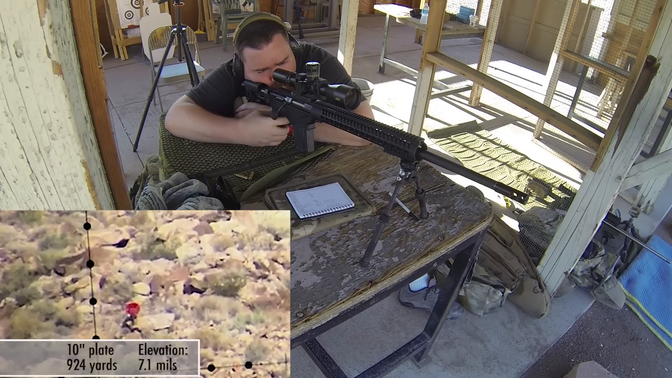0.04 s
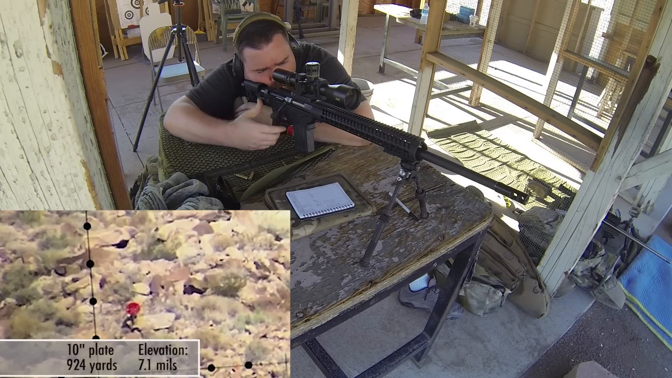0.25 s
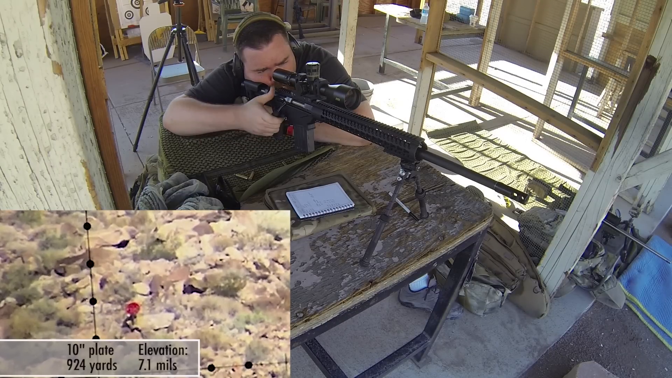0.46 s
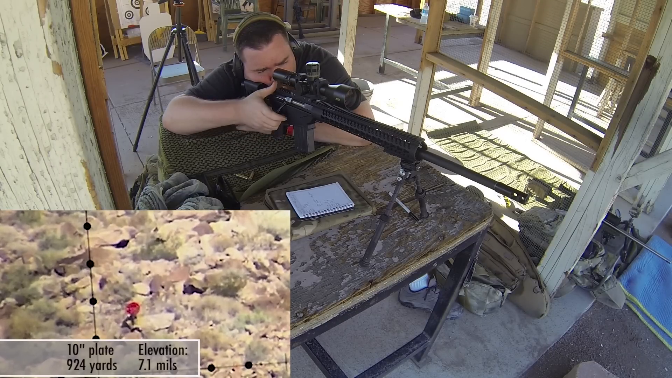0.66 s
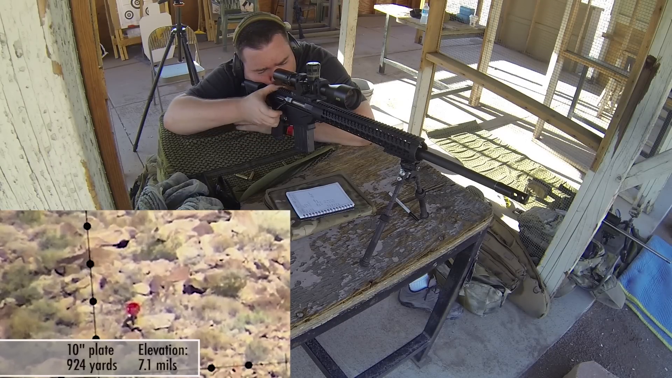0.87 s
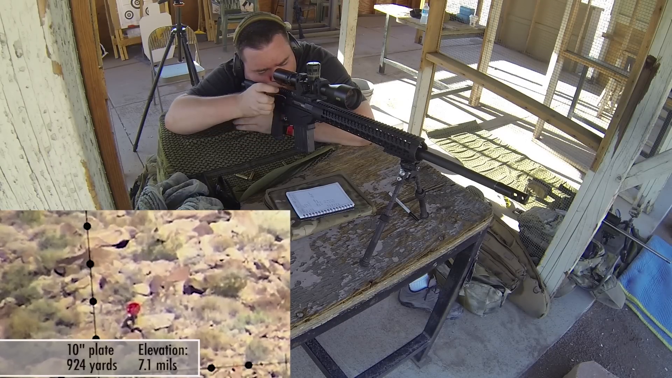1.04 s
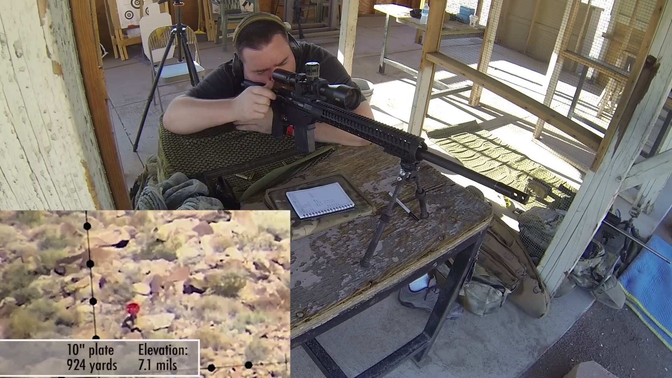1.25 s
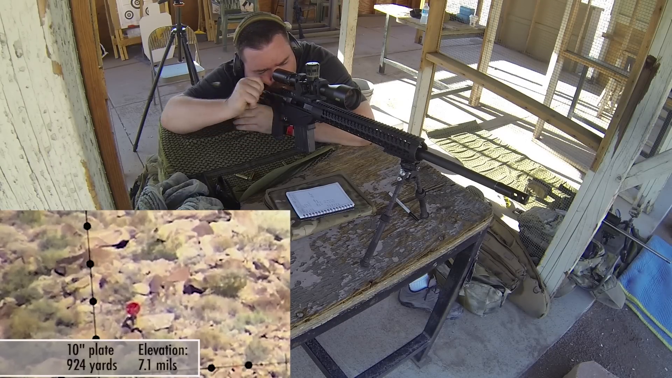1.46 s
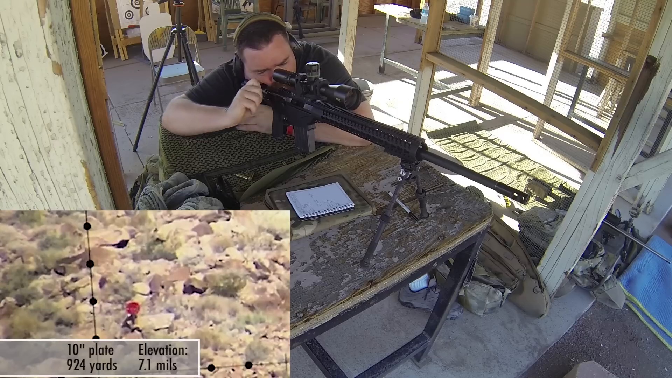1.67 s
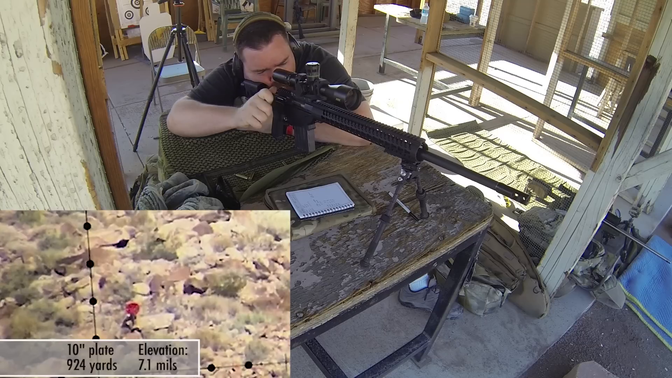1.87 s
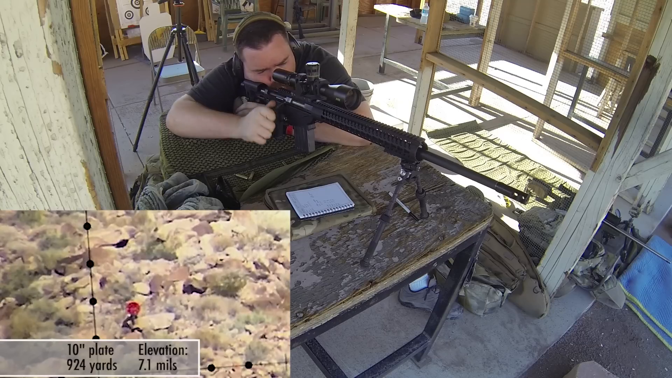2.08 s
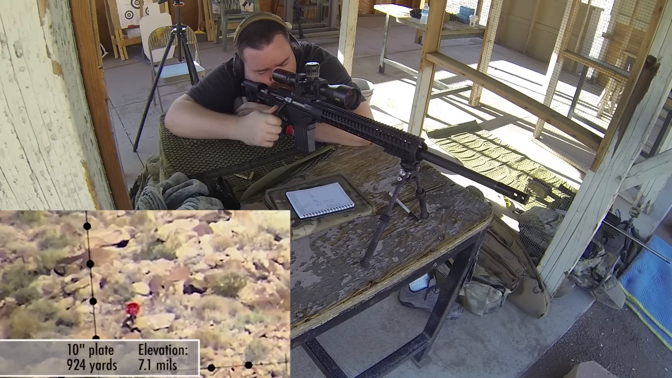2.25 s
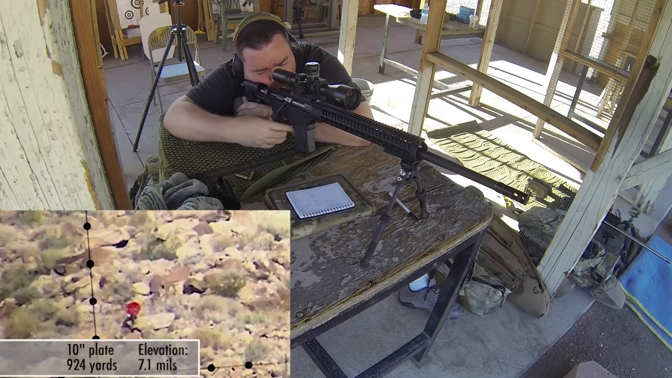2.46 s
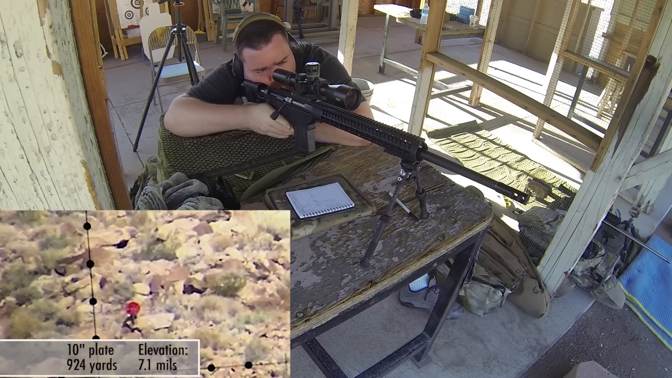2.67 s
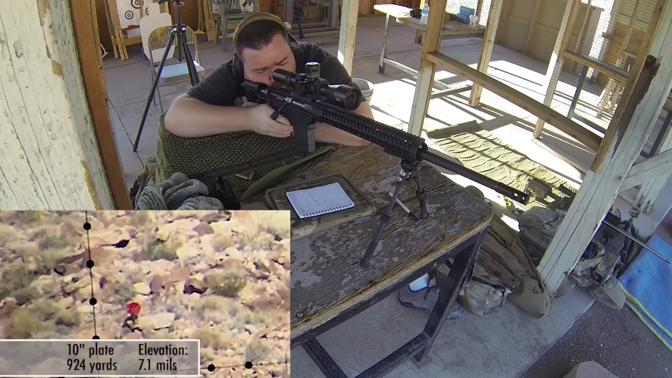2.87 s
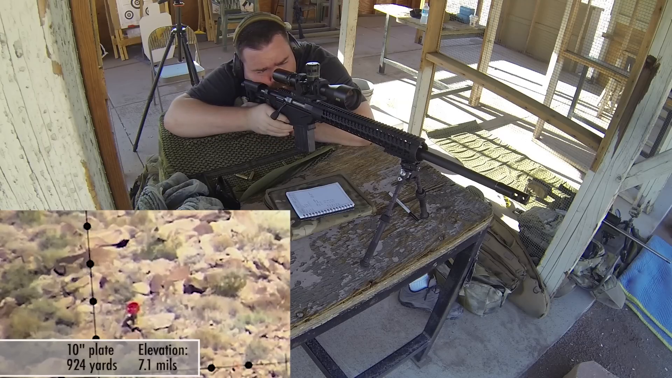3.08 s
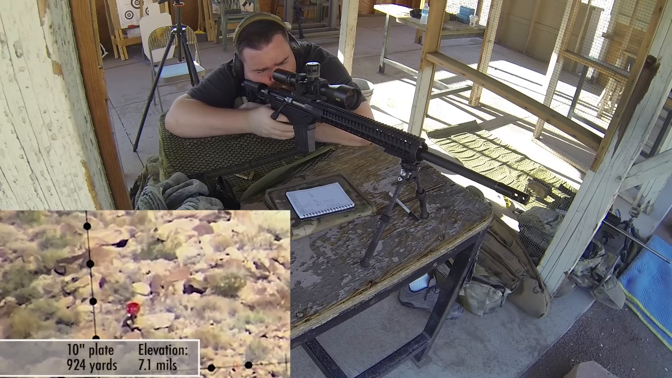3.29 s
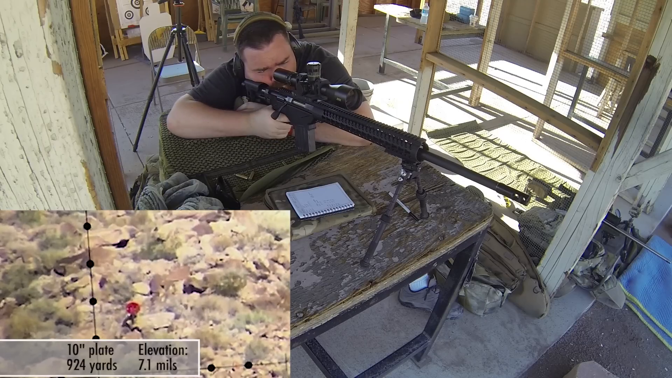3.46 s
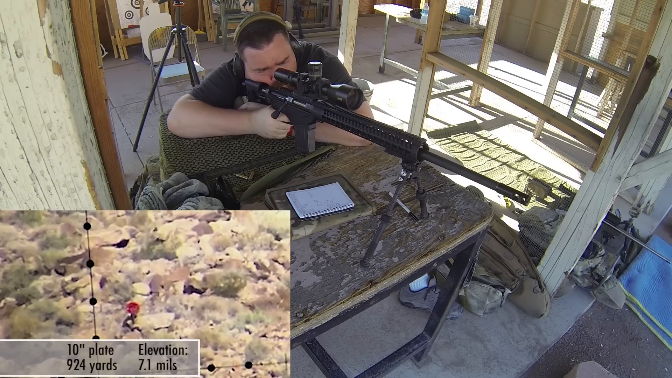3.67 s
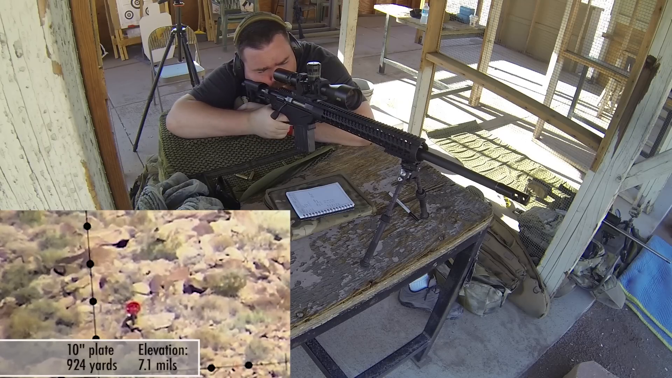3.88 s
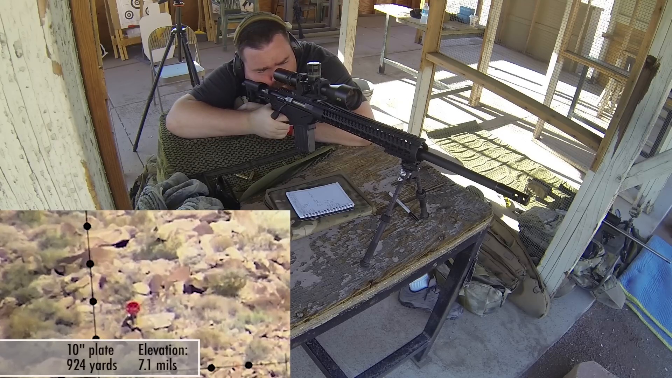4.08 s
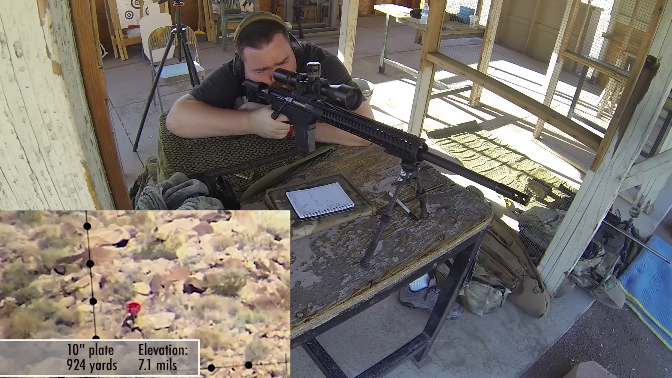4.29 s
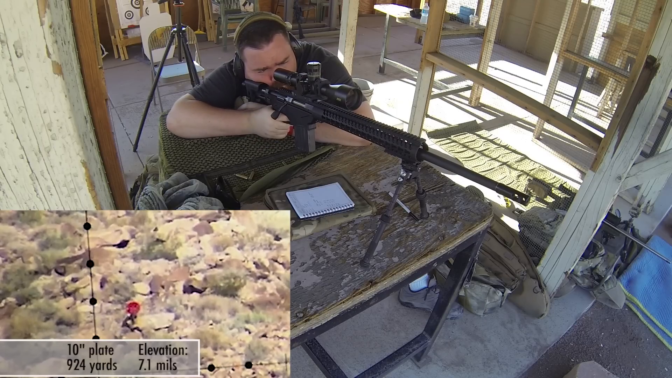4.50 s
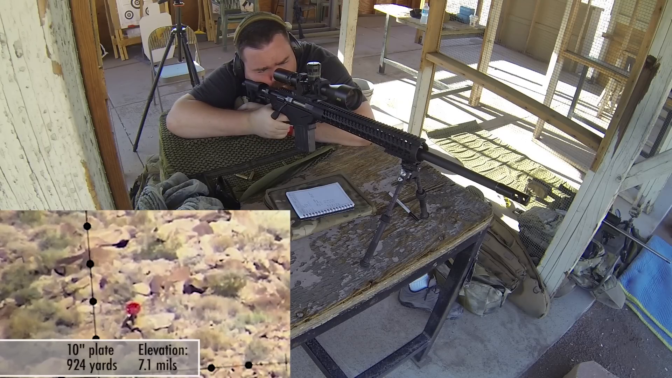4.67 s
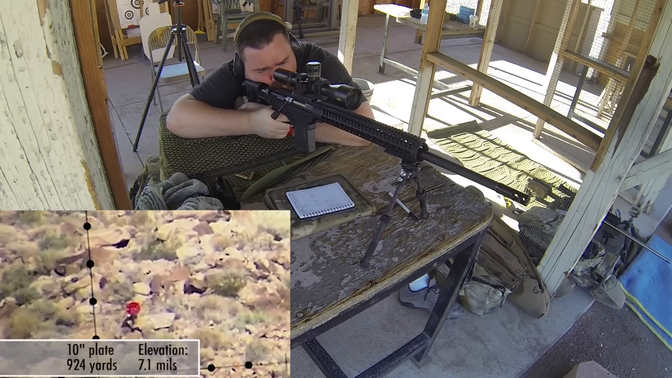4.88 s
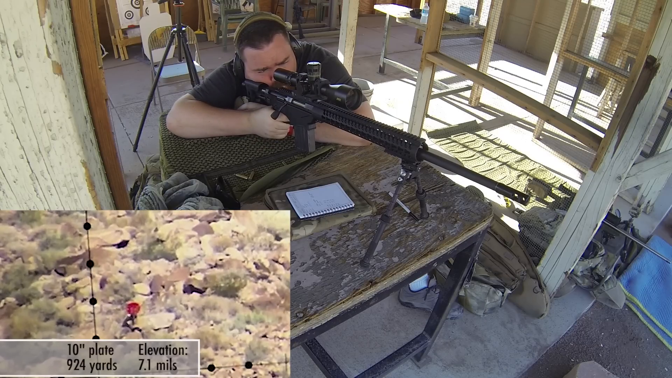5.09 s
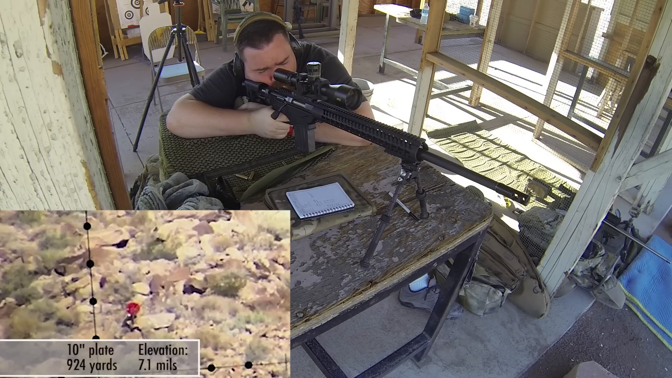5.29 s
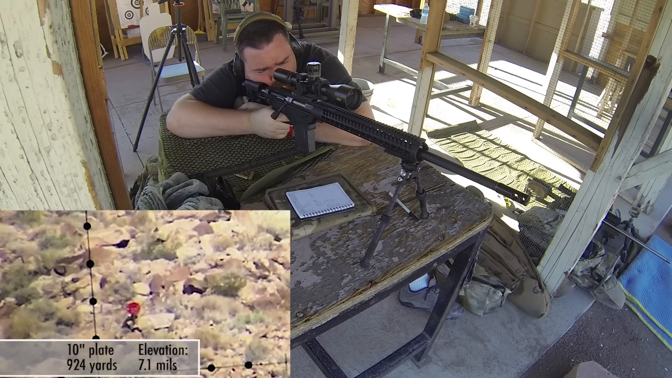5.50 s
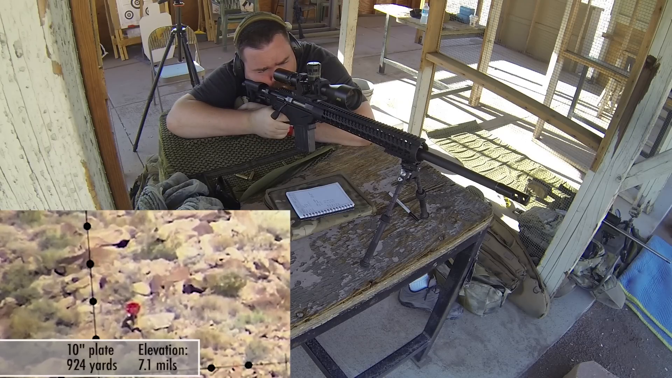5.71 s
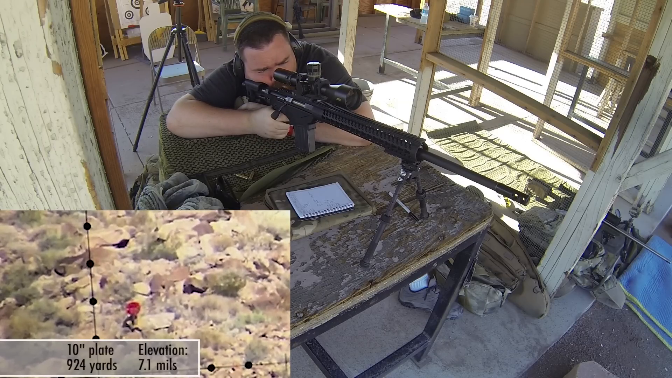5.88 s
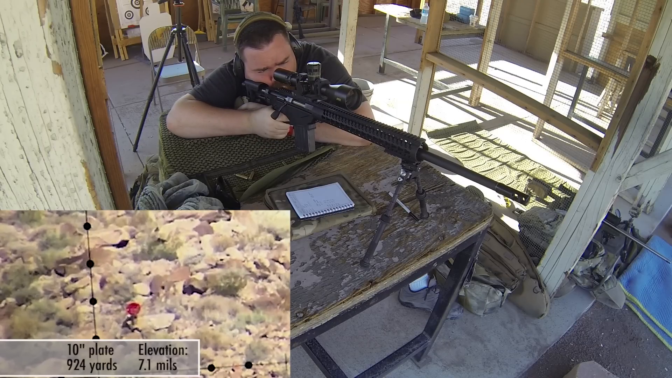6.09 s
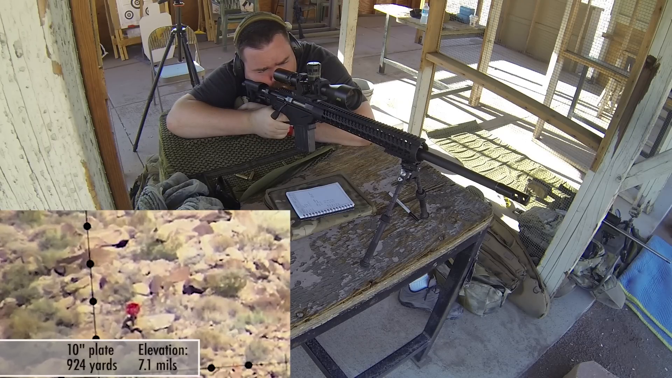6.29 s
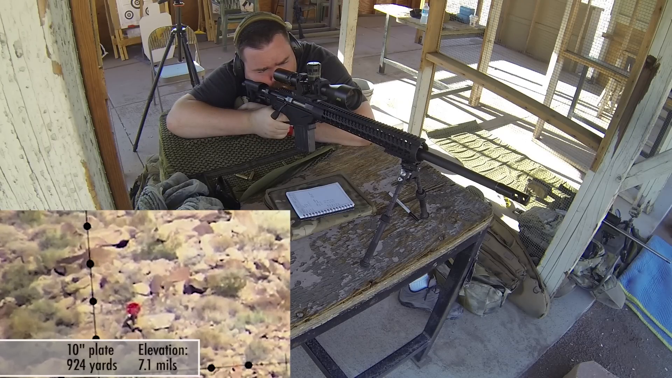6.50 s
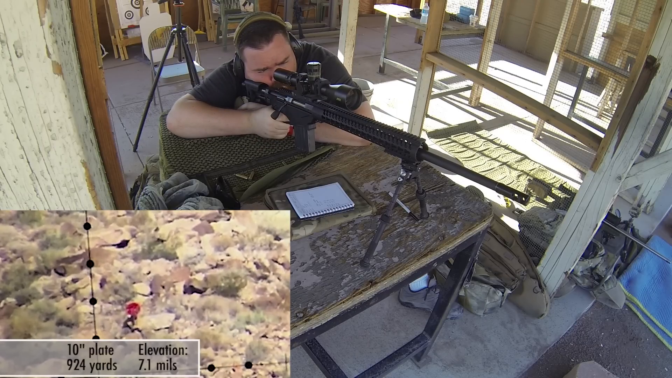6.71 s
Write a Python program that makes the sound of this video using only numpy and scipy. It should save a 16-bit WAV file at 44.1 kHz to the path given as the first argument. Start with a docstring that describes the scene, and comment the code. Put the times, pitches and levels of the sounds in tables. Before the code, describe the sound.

Very close, a bolt-action rifle is worked on a bench under an open roof: a hard steel clack, a fast rattling pull back, a gritty push forward and a firm snap shut. The empty brass case pings and hops on concrete. Quiet low outdoor rumble and faint engine hum follow, until a more distant shot thumps, echoes dully and rolls away into the hills.

```python
"""Bolt-action rifle under a range roof

Close to the microphone a rifle on a bench is cycled: steel contacts crack and ring, and the strokes between
them scrape by stick and slip. The brass case pings and bounces on concrete, a few decaying modes per hit.
Later a far shot thumps in: a blast wave, its duller reflections and scattered noise. Soft swells of noise
roll back from the hills over low air rumble, a distant engine's two partials and faint electronic chirps.
"""
import sys
import numpy as np
from scipy import signal
from scipy.fft import rfft, irfft, next_fast_len
from scipy.io import wavfile
from scipy.ndimage import map_coordinates

SR = 44100
rng = np.random.default_rng(int(sys.argv[2]) if len(sys.argv) > 2 else 0)


def to_wav(s):
    """Save 16-bit WAV."""
    ch = np.atleast_2d(s).T  # columns
    pcm = np.round(np.clip(ch, -1, 1) * 32767)  # PCM
    wavfile.write(sys.argv[1], SR, pcm.astype(np.int16))


N = 297586
TIME = np.arange(N) / SR  # s
RING = TIME[:SR // 2]  # half a second for one hit, s

# dense body of struck or scraped steel: [f/Hz, relative level/dB per Hz]
STEEL_SPECTRUM = [(100, -24), (300, -8), (700, -8.5), (1200, -5), (1700, 2), (2300, 0.5), (3200, -1),
                  (4800, 3), (7500, -4.5), (10000, -12), (13000, -25), (15500, -37)]
# the far shot and its reflections: [t/s, relative level/dB, treble edge f/Hz]
SHOT_ARRIVALS = [(5.258, 0, 7000), (5.3, -17.5, 900), (5.3087, -9.5, 600), (5.511, -10.5, 600)]
# treble scattered from the far shot: [f/Hz, relative level/dB per Hz]
SPRAY_SPECTRUM = [(300, 10), (700, 9.5), (1100, 4.5), (1600, 5), (2300, 1.5), (4500, -2), (6500, -6),
                  (9000, -21), (15000, -46)]
# scatter around the last reflection: [f/Hz, relative level/dB per Hz]
ECHO_SPECTRUM = [(150, 4), (400, 11.5), (900, 1.5), (1200, -2), (1650, 0), (2000, -16), (5000, -23),
                 (14000, -55)]


def undb(db):
    """Decibels to gain."""
    return 10 ** (np.asarray(db) / 20)


def unit(x):
    """Scale to rms 1."""
    return x / np.sqrt(np.mean(x ** 2))


def blow(x):
    """Scale a hit to the energy of one millisecond at full level."""
    return x / np.sqrt(np.sum(x ** 2) * 1000 / SR)


def fade(t60):
    """Exponential decay that falls by 60 dB in t60 seconds."""
    return np.exp(-np.log(1000) * RING / max(t60, 1 / SR))


def colour(x, points, tilt_db=0):
    """Causal minimum-phase filter through (Hz, dB) points, tilted per octave about 3 kHz."""
    size = 2 * next_fast_len(len(x) // 2 + 2048)
    octave = np.log2(np.maximum(np.fft.rfftfreq(size, 1 / SR), 10))
    hz, db = np.transpose(points)
    gain_db = np.interp(octave, np.log2(hz), db)
    gain_db = gain_db + tilt_db * np.clip(octave - np.log2(3000), -2, 2)
    # folding the cepstrum onto positive time makes the filter causal
    cepstrum = irfft(np.log(undb(gain_db)))
    cepstrum[1:size // 2] *= 2
    cepstrum[size // 2 + 1:] = 0
    response = np.exp(rfft(cepstrum))
    return irfft(rfft(x, size) * response)[:len(x)]


def edge(x, hz, kind, order=2):
    """Butterworth low-pass or high-pass."""
    sos = signal.butter(order, min(hz, SR / 2 - 1), kind, fs=SR, output="sos")
    return signal.sosfilt(sos, x)


def noise(points):
    """Steady noise of a given spectrum."""
    return unit(colour(rng.standard_normal(N), points))


def walk(rate):
    """Random wander with an rms of 1, through `rate` random points per second."""
    knots = rng.standard_normal(2048)
    return unit(np.interp(TIME * rate, np.arange(len(knots)), knots))


def ring(modes, detune):
    """Decaying modes of fixed relative strength; sign and, slightly, pitch vary from blow to blow."""
    chance = rng.standard_normal((len(modes), 2))
    tone = 0
    for (hz, db, t60), (side, shift) in zip(modes, chance):
        swing = np.sin(2 * np.pi * hz * (1 + detune * shift) * RING)
        tone = tone + np.sign(side) * undb(db) * fade(t60) * swing
    return blow(tone)


def crack(points, t60, tilt_db=0):
    """Decaying coloured noise: a dense cloud of short-lived modes."""
    return blow(colour(rng.standard_normal(len(RING)) * fade(t60), points, tilt_db))


def add(track, s, sound):
    """Mix a sound in at a time in seconds."""
    start = max(int(s * SR), 0)
    track[start:start + len(sound)] += sound[:N - start]


def slips(rate, spread_db):
    """Stick and slip: tiny catches of uneven size at random moments, `rate` per second on average."""
    caught = rng.random(N) < rate / SR
    side = rng.choice([-1, 1], N)
    return caught * side * undb(spread_db * np.minimum(rng.exponential(size=N), 3))


def rub(catches, points, modes, ring_db):
    """A run of catches heard through a dense body and its few clear modes."""
    tone = signal.fftconvolve(catches, ring(modes, detune=.0005))[:N]
    return unit(unit(colour(catches, points)) + undb(ring_db) * unit(tone))


def stroke(start, length, attack_s, t60, growth_db=0):
    """Envelope of one movement: quick rise up to its start, growing or easing hold, exponential release."""
    age = TIME - start
    attack = np.exp(-np.minimum(age / attack_s, 0) ** 2)
    hold = undb(growth_db * (np.clip(age / length, 0, 1) - .5))
    return attack * hold * np.exp(-np.log(1000) * np.maximum(age - length, 0) / t60)


def action(gain_db=-1, rise_s=0.00096):
    """Each contact cracks and rings the open bolt or, once home, mostly the receiver; cracks and rings apart."""
    # steel meeting steel: [t/s, relative level/dB, chatter t60/s, tilt/dB per octave, relative ring level/dB]
    contacts = [ (.308, -38, .058, -15, -6), (.742, -44, .066, -4.5, -6), (.914, -40, 0.066, -4, -3),
                (0.9414, -33.5, .06, -6, -8.5), (0.971, -16, 0.22, 3, -14), (.998, -3, 0.051, 0.8, 3),
                (1.169, -22.5, 0.061, -9.5, -8), (1.191, -23, 0.03, -3.5, -2.5),
                (1.209, -29, .059, 7, -10.5), (1.243, -19, 0.079, -0.5, -3), (1.255, -14.5, 0.17, -2.5, -3),
                (1.273, -12.5, 0.17, -2, -17), (1.284, -11, 0.082, 1.5, 0.5),
                (1.320, -7.5, 0.032, -4, -9.5), (1.325, -5, .05, -2, -10.5), (1.333, -1.5, 0.051, .5, -13),
                (1.606, -11, 0.065, 0, -6), (1.614, -5.5, 0.19, -6, -8.5), (1.7187, -9.5, 0.063, 1.5, -9),
                (1.738, -6, 0.044, -2, -10.5), (1.754, -2.5, 0.09, -.5, -13), (1.758, -5.5, 0.22, 5.5, -7),
                (1.794, -10, 0.045, -2.5, -7.5), (1.8001, -3.5, 0.036, -1, -3),
                (2.005, -31, .045, -10.5, -5.5), (2.0188, -0.5, 0.0071, 0, -3),
                (2.0236, -9, 0.021, 14, -1.5), (2.079, -16, .11, -3, -9.5)]
    # modes of the bolt: [f/Hz, relative level/dB, t60/s]
    bolt_modes = [(1042, -14, 0.15), (1285, -10.5, 0.1), (1595, -13, 0.013), (1827, -8, 0.033),
                  (2780, -13, .035), (3690, -1, 0.052), (3990, -3, .045), (4120, -6, 0.043),
                  (4660, 0.5, 0.022), (5650, 1.5, 0.026), (7050, -7.5, 0.064), (9300, -16.5, 0.016)]
    # modes of the receiver: [f/Hz, relative level/dB, t60/s]
    receiver_modes = [(1223, -3, 0.016), (1480, -4, 0.087), (1498.6, -2.5, 0.055), (1600, -3.5, 0.022),
                      (1710, -3.5, 0.02), (3130, -16, 0.032), (3270, -12, 0.062), (3900, -11.5, .025),
                      (5470, -3.5, 0.048), (6000, -6, 0.028), (6540, -1, 0.025), (7300, -2.5, 0.033),
                      (7976, -6, 0.026), (8640, -2.5, .025)]
    shut_s = 1.79  # from here on the bolt is home and passes its blows to the receiver
    cracks, rings = np.zeros(N), np.zeros(N)
    for s, db, t60, tilt_db, ring_db in contacts:
        bolt_db, receiver_db = (-2, -8.5) if s < shut_s else (-12, 1.5)
        force = undb(db + gain_db) * (1 - np.exp(-RING / rise_s))
        add(cracks, s, force * crack(STEEL_SPECTRUM, t60, tilt_db))
        bolt = undb(bolt_db) * ring(bolt_modes, detune=.005)
        receiver = undb(receiver_db) * ring(receiver_modes, detune=0.0069)
        add(rings, s, force * undb(ring_db) * (bolt + receiver))
    return cracks, rings


def sliding():
    """Stick-slip catches: bolt along its raceway, cartridge out of the magazine, stock under the hand."""
    # bolt strokes (lift, pull back, meet the round, strip it, chamber it):
    # [start t/s, length/s, scrape mid-stroke level/dB, cartridge grind mid-stroke level/dB, growth/dB]
    bolt_strokes = [(0.938, 0.059, -55.5, -48.5, 15), (1.203, .13, -38, -50.5, 16.5),
                    (1.542, 0.048, -70, -44.5, -8), (1.619, 0.074, -39, -22.5, -7),
                    (1.731, 0.045, -22, -29, -3)]
    # the hand loading stock and bench: [start t/s, length/s, level/dB, t60 of the rumble after it/s]
    hand_pushes = [(.96, 0.073, -57.5, 0.55), (1.15, 0.035, -48, 0.39), (1.309, .03, -43.5, 0.21),
                   (1.534, .1, -35.5, .5), (1.676, .12, -32.5, 2.0)]
    # dense body of the cartridge grind: [f/Hz, relative level/dB per Hz]
    grind_spectrum = [(150, -16.5), (400, -12.5), (620, -4.5), (780, 2), (900, -5), (1020, 2.5), (1200, -4),
                      (1480, -1), (1900, -12.5), (2250, -12), (3000, -16), (5000, -22), (9000, -37),
                      (15500, -60)]
    # rumble of the stock: [f/Hz, relative level/dB per Hz]
    stock_spectrum = [(50, -16.5), (110, -5), (180, 1.5), (260, -5.5), (340, -15.5), (500, -12),
                      (900, -26.5), (2500, -57.5), (10000, -88)]
    # clear modes of the magazine: [f/Hz, relative level/dB, t60/s]
    magazine_modes = [(173.5, 0.5, 0.25), (316.5, -3, 0.23), (608, -3, 0.067), (685, -1, .06),
                      (705.6, -3.5, 0.13), (789, 2.5, 0.19), (1008, -1.5, 0.0587), (1257, 0.5, .1),
                      (1440, -1.5, .05), (1460, -0.5, 0.034), (2246, 4.5, 0.038)]
    # clear modes of the raceway: [f/Hz, relative level/dB, t60/s]
    raceway_modes = [(1110, -6, 0.06), (1516, 0, 0.038), (1746, -0.5, 0.035), (2930, 2, 0.082),
                     (3100, 0, 0.099), (3022, -3, .09), (3210, 0.5, 0.16), (3601, 1.5, 0.048),
                     (3750, 0, .03), (4677, 2, 0.017), (5260, -1, .13)]
    attack_s, scrape_t60_s, grind_t60_s, push_attack_s = 0.013, 0.067, 0.51, .015
    scraping, grinding = np.zeros(N), np.zeros(N)
    for s, length, scrape_db, grind_db, growth_db in bolt_strokes:
        scrape = undb(scrape_db) * stroke(s, length, attack_s, scrape_t60_s, growth_db)
        scraping = np.maximum(scraping, scrape)
        grind = undb(grind_db) * stroke(s, length, attack_s, grind_t60_s, growth_db)
        grinding = np.maximum(grinding, grind)
    pushing = np.zeros(N)
    for s, length, db, t60 in hand_pushes:
        pushing = np.maximum(pushing, undb(db) * stroke(s, length, push_attack_s, t60))
    steel = rub(slips(rate=1700, spread_db=6.0), STEEL_SPECTRUM, raceway_modes, ring_db=-4.5)
    cartridge = rub(slips(rate=1200, spread_db=2.0), grind_spectrum, magazine_modes, ring_db=-5.5)
    stock = unit(colour(slips(rate=900, spread_db=-0.5), stock_spectrum))
    return scraping * steel + grinding * cartridge + pushing * stock


def extraction(attack_s=0.0045, t60=.04):
    """Fine catches make the case wall squeal under the extractor as it is dragged out of the chamber."""
    # damped modes of the held case wall: [f/Hz, relative level/dB, t60/s]
    held_modes = [(10000, 5, .02), (10300, -3.5, 0.013), (15200, -8, .012)]
    start_s, length_s, level_db = 1.278, .038, -33
    drag = undb(level_db) * stroke(start_s, length_s, attack_s, t60)
    squeal = signal.fftconvolve(slips(rate=1400, spread_db=3.0), ring(held_modes, detune=0.0025))[:N]
    return drag * unit(squeal)


def brass(rise_s=0.00075, spin_hz=17, spin_depth=0.76):
    """The empty case pings as it is thrown out, then hops on the floor; contact shortens its free ring."""
    # hits of the case: [t/s, level/dB, relative hollow ring/dB, relative wall ring/dB, share of free t60 (0-1)]
    hits = [(1.613, -28.5, -16, -1, 0.25), (2.225, -18, -12.5, -14.5, 0.45), (2.231, -20, -10, -13, 0.56),
            (2.496, -28, 1, -12, 0), (2.501, -27.5, -5, -4, 0.84), (2.646, -32.5, -4, -2, 0.27),
            (2.72, -35.5, 2.5, -29, 0.3), (2.774, -51, 9, -9, 0.15), (2.8, -55, 7, -12, 0.4),
            (2.855, -44.5, -20, 8, 0.8)]
    # modes of the hollow case: [f/Hz, relative level/dB, free t60/s]
    hollow_modes = [(1381, -1, 0.14), (1410, -2, .08), (1439, 9.5, 0.15), (1507, 2.5, .08),
                    (2310, -10.5, 0.11), (4390, -13.5, .1), (5410, -2.5, 0.14), (5470, -5.5, .16),
                    (5500, -17.5, .16), (5640, -3, .16)]
    # modes of the case wall: [f/Hz, relative level/dB, free t60/s]
    wall_modes = [(9810, 5.5, 0.22), (9600, -6, .18), (14640, -25, .14), (15310, -20, .18)]
    # crack against the concrete: [f/Hz, relative level/dB per Hz]
    floor_spectrum = [(300, -15.5), (900, -2), (1400, 6), (2000, -1.5), (4000, -0.5), (5700, 4), (7500, -9),
                      (10000, -12.5), (13000, -33.5), (15500, -26.5)]
    out = np.zeros(N)
    for s, db, hollow_db, wall_db, free in hits:
        hollow = [(hz, mode_db, t60 * free) for hz, mode_db, t60 in hollow_modes]
        wall = [(hz, mode_db, t60 * free) for hz, mode_db, t60 in wall_modes]
        # the tumbling case turns its open mouth toward and away from the microphone
        tumble = 1 + spin_depth * np.sin(2 * np.pi * (spin_hz * RING + rng.random()))
        tone = undb(hollow_db) * ring(hollow, detune=0.0029)
        tone = tone + undb(wall_db) * ring(wall, detune=0.00025)
        hit = crack(floor_spectrum, t60=0.078) + tumble * tone
        add(out, s, undb(db) * hit * (1 - np.exp(-RING / rise_s)))
    return out


def far_shot(peak_db=-5, push_s=0.0019, low_hz=55, crack_db=-19, echo_db=-26):
    """A blast wave (sharp push, longer suction) and its duller reflections from berms and walls."""
    # crack riding on the first arrival: [f/Hz, relative level/dB per Hz]
    crack_spectrum = [(200, -4), (500, 6), (950, 15), (1200, 0), (1450, -26), (1800, -2.5), (2500, -16),
                      (3250, 3), (3600, -3), (3900, 2), (4500, -8.5), (6500, -4.5), (10000, -14.5),
                      (12500, -40), (14500, -70)]
    # a sharp tick in the wake of the shot: t/s, level/dB
    tick_s, tick_db = (5.388, -32)
    out = np.zeros(N)
    wave = (RING / push_s - 1) * np.exp(-RING / push_s)
    wave = edge(wave, low_hz, "high", order=1)
    wave = colour(wave, [(100, 8.5), (250, 1), (900, -19), (1250, -22), (1800, -11), (3500, -12),
                         (8000, -39), (14000, -62)])
    for s, db, top_hz in SHOT_ARRIVALS:
        add(out, s, undb(peak_db + db) * edge(wave, top_hz, "low"))
    add(out, SHOT_ARRIVALS[0][0], undb(crack_db) * crack(crack_spectrum, t60=0.031))
    add(out, tick_s, undb(tick_db) * crack(SPRAY_SPECTRUM, t60=0.015, tilt_db=1))
    add(out, SHOT_ARRIVALS[-1][0], undb(echo_db) * crack(ECHO_SPECTRUM, t60=.05))
    return out


def scatter(tail_db=-29, tail_t60=0.58, roll_db=-42, roll_t60=1.6, spray_db=-44, spray_t60=1.5,
            patchy_db=2, echo_tail_db=-44, echo_tail_t60=0.5):
    """Rough ground scatters the shot: quick low tumble, long roll, patchy treble, tail on the last echo."""
    # low scattered noise: [f/Hz, relative level/dB per Hz]
    tail_spectrum = [(30, -4), (110, 2.5), (250, -5.5), (600, -13), (900, -24.5), (2000, -58), (6000, -52),
                     (15000, -77)]
    age = TIME - SHOT_ARRIVALS[0][0]
    sinking_db = -60 * np.maximum(age, 0)  # divided by a t60 to give the decay
    tumble_gain = undb(tail_db + sinking_db / tail_t60)
    roll_gain = undb(roll_db + sinking_db / roll_t60)
    low = (tumble_gain + roll_gain) * noise(tail_spectrum)
    spray_gain = undb(spray_db + sinking_db / spray_t60 + patchy_db * walk(70))
    spray = spray_gain * noise(SPRAY_SPECTRUM)
    echo_age = TIME - SHOT_ARRIVALS[-1][0]
    echo_gain = undb(echo_tail_db - 60 * np.maximum(echo_age, 0) / echo_tail_t60)
    echo_tail = echo_gain * noise(ECHO_SPECTRUM)
    return (age > 0) * (low + spray) + (echo_age > 0) * echo_tail


def hills(flicker_db=0.5, sag_octaves_per_s=.25):
    """Rock faces return shots as soft swells of noise that die away and sink in pitch."""
    # shots rolling back: [peak t/s, level/dB, centre f/Hz, rise/s, t60/s]
    returns = [(.1, -54, 930, 0.11, 1.7), (.75, -55.5, 620, 0.4, 6.8), (6.58, -47.5, 937, 0.13, 7.8)]
    # band of each roll: [f as a multiple of the centre, relative level/dB per Hz]
    band = [(.15, -9.5), (.4, -3.5), (.7, 1.5), (.95, 3.5), (1.3, -4), (1.9, -4.5), (2.4, -11.5),
            (3.2, -16), (6, -26.5), (14, -50)]
    out = np.zeros(N)
    for s, db, centre_hz, rise_s, t60 in returns:
        before, after = np.maximum(s - TIME, 0), np.maximum(TIME - s, 0)
        swell = np.exp(-np.log(1000) * after / t60) / (1 + (before / rise_s) ** 2)
        roll = noise([(k * centre_hz, d) for k, d in band])
        # reading the noise ever more slowly lowers its pitch
        position = np.cumsum(2 ** (-sag_octaves_per_s * after))
        out += undb(db) * swell * map_coordinates(roll, [position], order=3, mode="wrap")
    return out * undb(flicker_db * walk(25))


def shelter(low_t60, mid_t60, high_t60, build_s):
    """Response of roof, posts and floor: a quick diffuse tail, each band with its own decay."""
    # colour of the sheltered space: [f/Hz, relative level/dB]
    roof_spectrum = [(80, -6.5), (250, 4), (700, 2), (1500, 0), (3000, -1.5), (6000, -2), (10000, 3),
                     (15000, 4)]
    echoes = rng.standard_normal(len(RING))
    low = edge(echoes, 600, "low", order=1)
    high = edge(echoes, 6000, "high", order=1)
    tail = low * fade(low_t60) + (echoes - low - high) * fade(mid_t60) + high * fade(high_t60)
    tail = colour(tail * (1 - np.exp(-RING / build_s)), roof_spectrum)
    return tail / np.sqrt(np.sum(tail ** 2))


def background(air_db=-44.12, gust_db=0.44, engine_hz=113.4, waver_db=2):
    """Outdoor air whose rumble wanders, and a wavering engine hum whose two partials each swell once."""
    # outdoor air: [f/Hz, relative level/dB per Hz]
    air_spectrum = [(12, -29.5), (20, 2), (119, -0.5), (140, -13), (171, -9.5), (191, -20.5), (232, -14.5),
                    (252, -16.5), (491, -23.5), (958, -32), (1600, -36.5), (2500, -35.5), (3400, -39),
                    (4000, -37), (4680, -41.5), (6200, -39), (7900, -45.5), (8880, -45), (15500, -54)]
    # partials of the distant engine: [multiple, steady level/dB, swell/dB, swell t/s, swell width/s]
    partials = [(1, -57.5, 8.5, 5.4, 0.46), (2, -66, 12.5, 6.27, 0.9)]
    air = noise(air_spectrum) * undb(air_db)
    rumble = edge(air, 300, "low", order=1)
    out = air + rumble * (undb(gust_db * walk(4.9)) - 1)
    phase = 2 * np.pi * np.cumsum(engine_hz * (1 + 0.00735 * walk(3.7))) / SR
    for multiple, db, swell_db, s, width_s in partials:
        swell = np.exp(-((TIME - s) / width_s) ** 2)
        level_db = db + swell_db * swell + waver_db * walk(2)
        out = out + undb(level_db) * np.sqrt(2) * np.sin(round(multiple) * phase)
    return out


def whine(whine_hz=5230, whine_db=-68, hiss_db=-73):
    """Faint electronic interference: an arched chirp at an even rate, a puff of hiss between the chirps."""
    pulse_hz, pulse_peak_s, waver, droop_hz = 23.98, .0048, .01, 450
    pulse = .5 + .5 * np.cos(2 * np.pi * pulse_hz * (TIME - pulse_peak_s))
    hz = whine_hz * (1 + waver * walk(60)) - droop_hz * (1 - pulse)
    tone = np.sqrt(2) * np.sin(2 * np.pi * np.cumsum(hz) / SR)
    chirps = undb(whine_db) * pulse ** 2 * tone
    hiss = noise([(7500, -40), (8600, 1.5), (9200, 3.5), (10200, -41.0)])
    return chirps + undb(hiss_db) * (1 - pulse) * hiss


def scene(rifle_room_db=-9, ring_room_db=-20, case_room_db=-1, shot_room_db=-20):
    """The rifle is close; the case lands behind the bench and reaches the microphone largely off the roof."""
    cracks, rings = action()
    rifle, case, shot = cracks + sliding(), brass(), far_shot()
    near = shelter(low_t60=0.48, mid_t60=0.32, high_t60=0.14, build_s=.005)
    behind = shelter(low_t60=0.4, mid_t60=0.23, high_t60=0.25, build_s=.004)
    sent = undb(rifle_room_db) * rifle + undb(ring_room_db) * rings + undb(shot_room_db) * shot
    room = signal.fftconvolve(sent, near)[:N]
    room += signal.fftconvolve(undb(case_room_db) * case, behind)[:N]
    bench = rifle + rings + extraction() + case
    distance = shot + scatter() + hills() + background()
    return (bench + room + distance + whine())[None]


def record(dry):
    """The microphone chain rounds the highest peaks and cuts steeply above 15.7 kHz."""
    top_cut = signal.ellip(10, .2, 80, 15700, fs=SR, output="sos")
    return signal.sosfilt(top_cut, np.tanh(dry))


dry = scene()
out = record(dry)
to_wav(out)
```